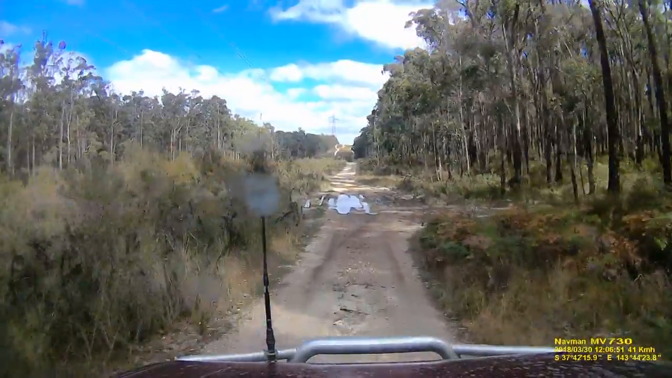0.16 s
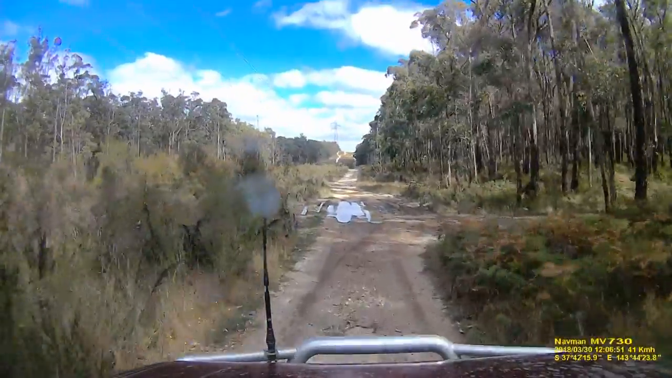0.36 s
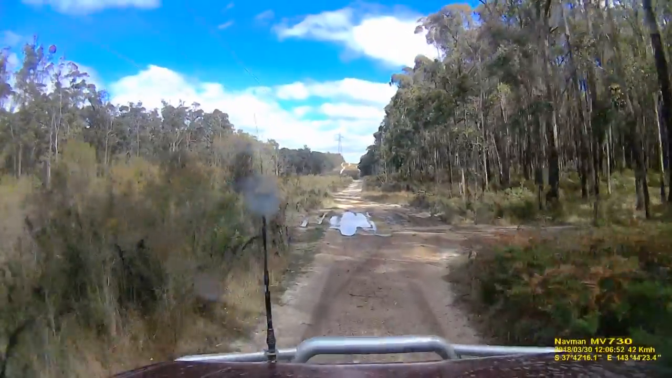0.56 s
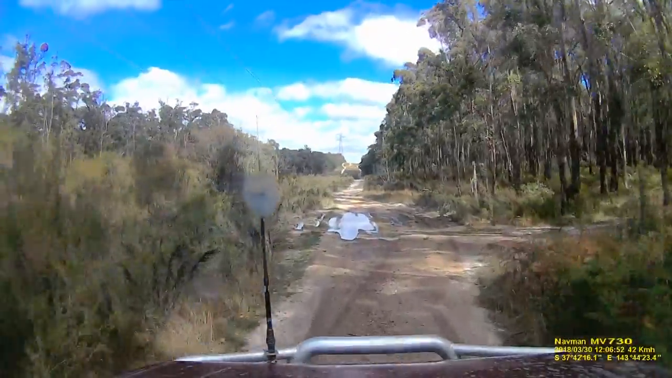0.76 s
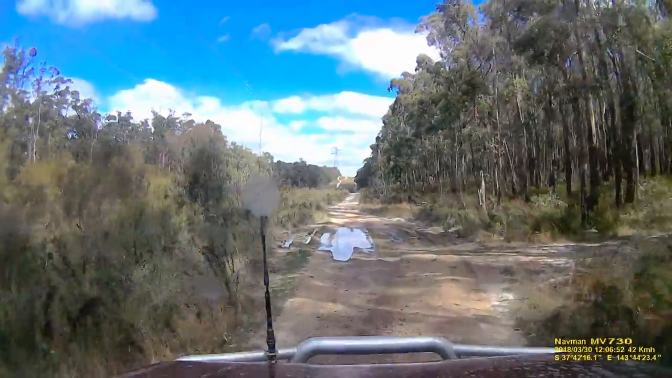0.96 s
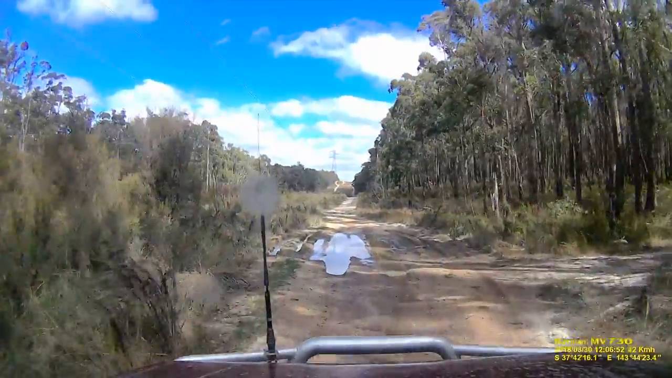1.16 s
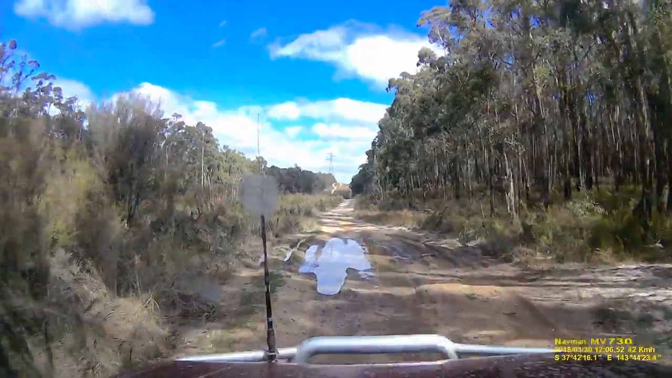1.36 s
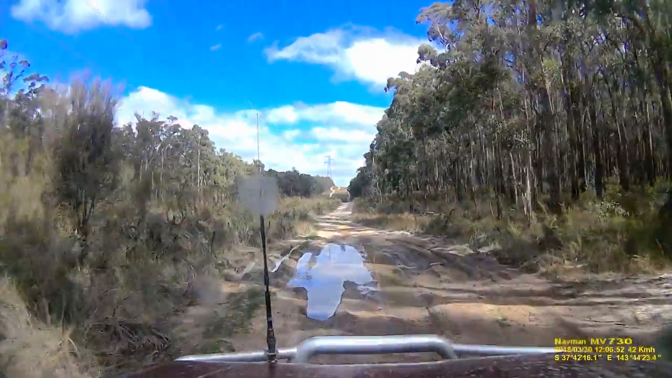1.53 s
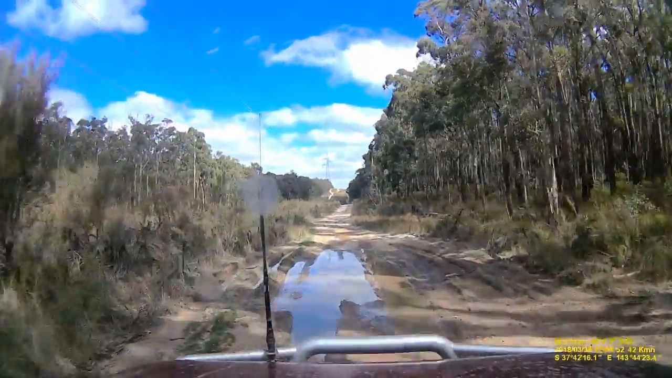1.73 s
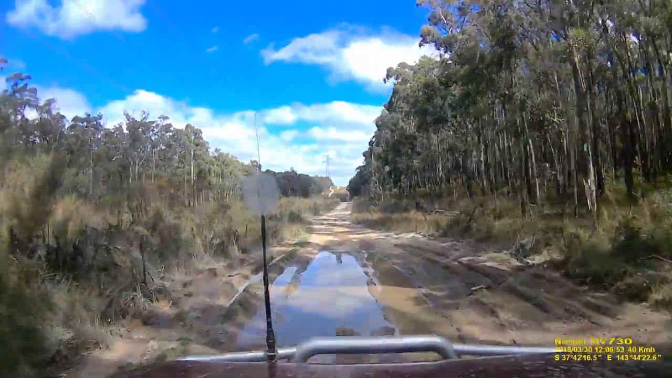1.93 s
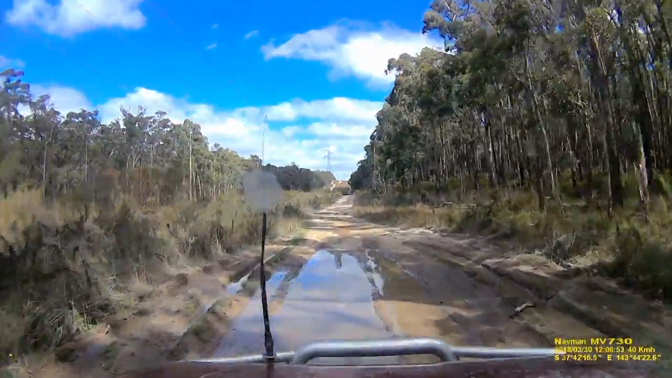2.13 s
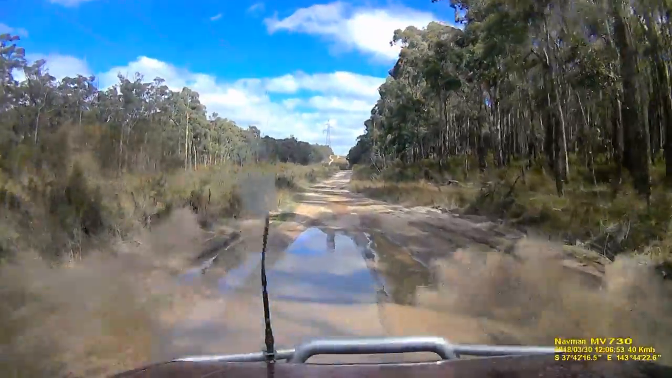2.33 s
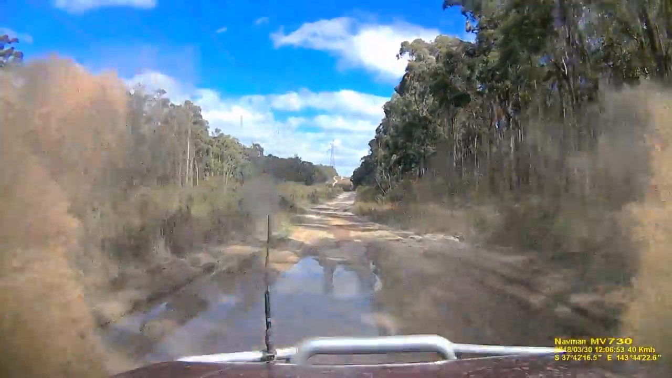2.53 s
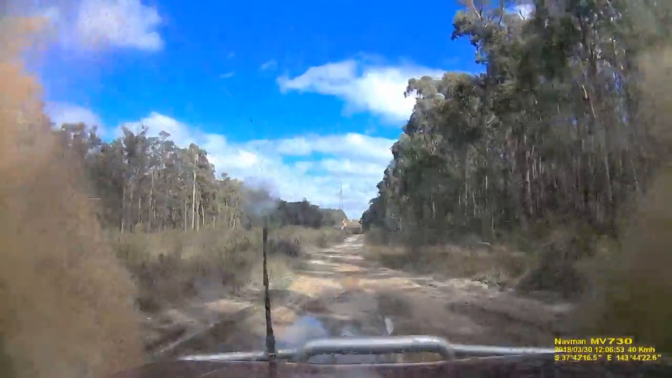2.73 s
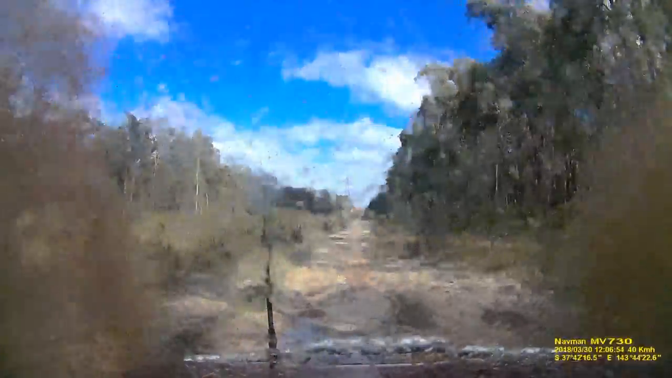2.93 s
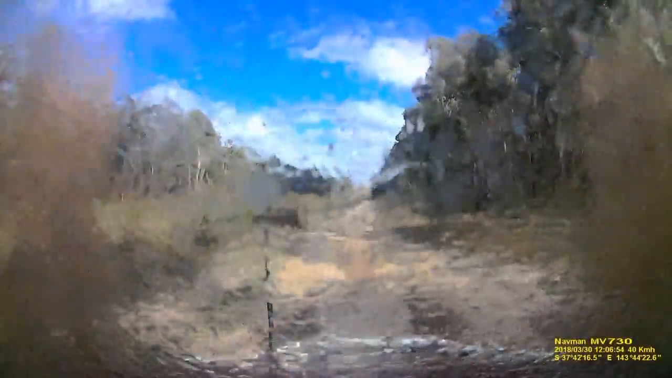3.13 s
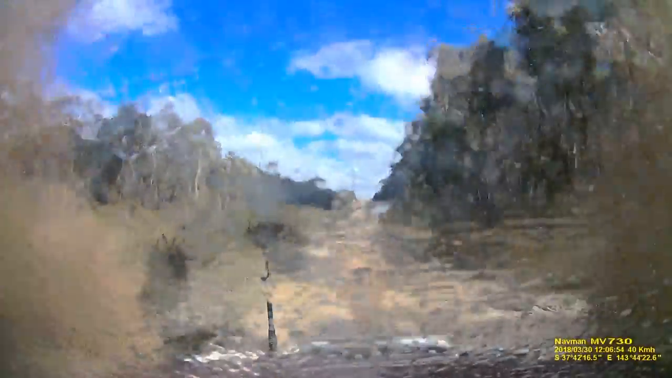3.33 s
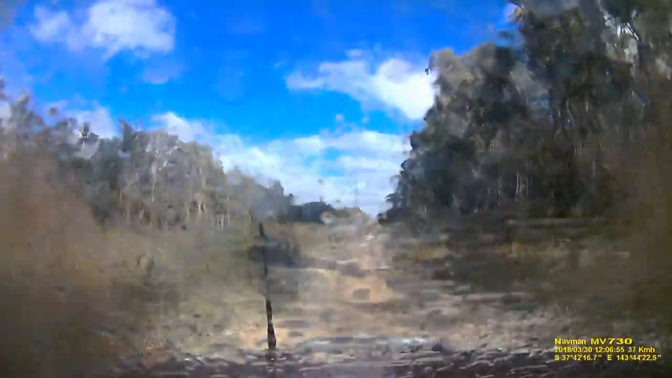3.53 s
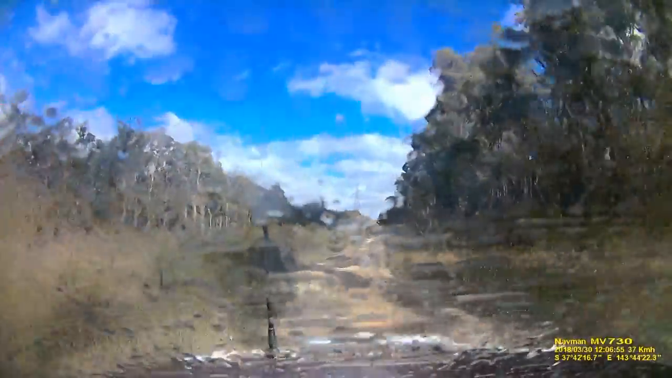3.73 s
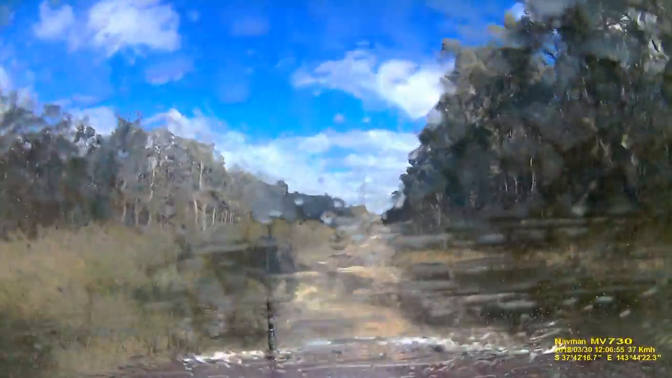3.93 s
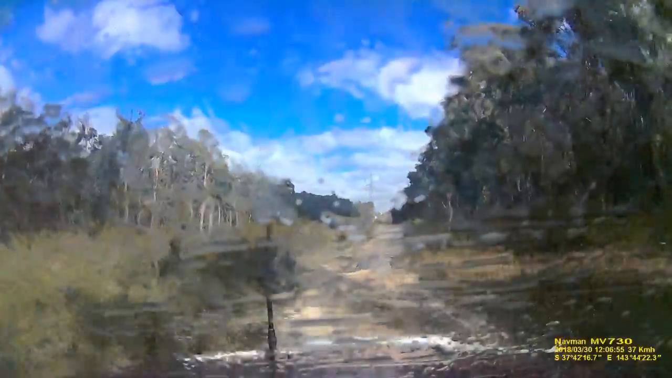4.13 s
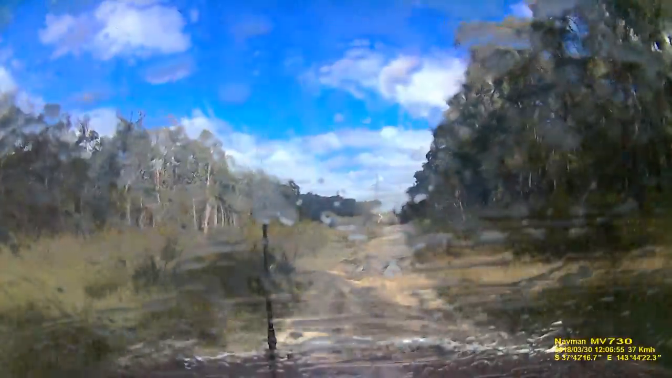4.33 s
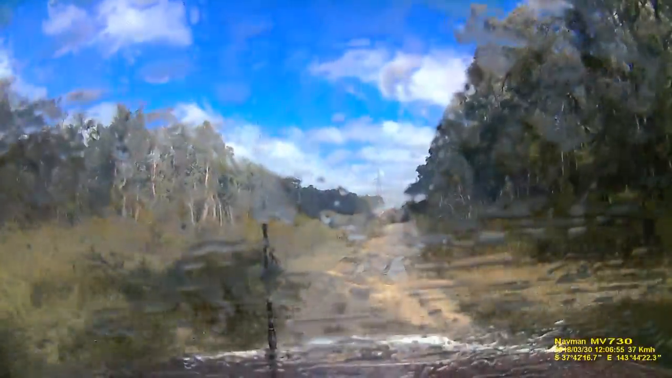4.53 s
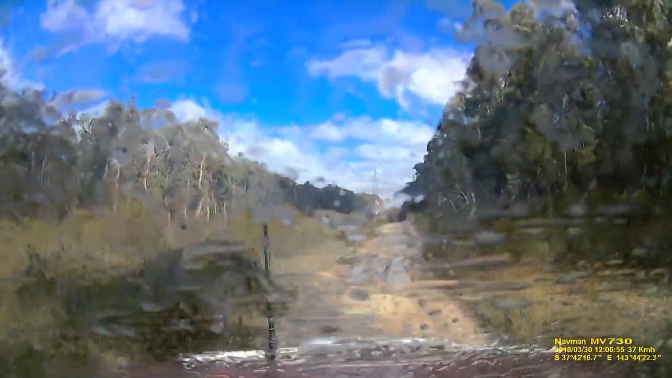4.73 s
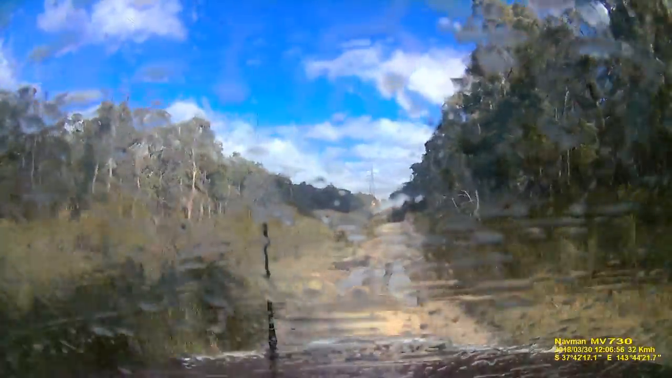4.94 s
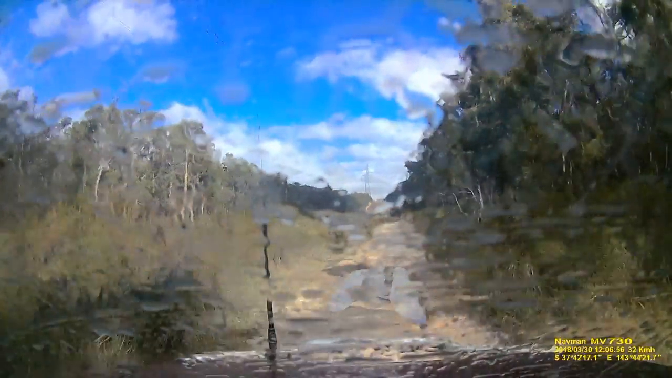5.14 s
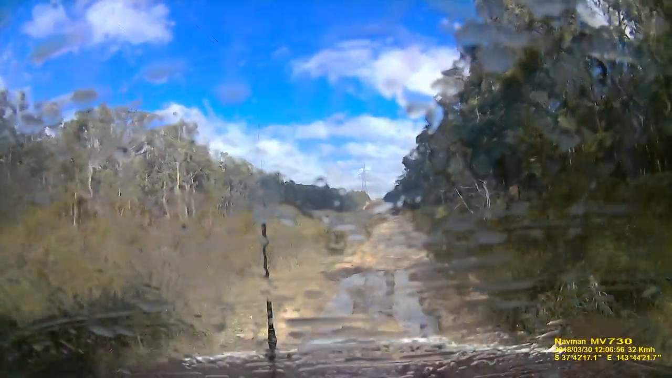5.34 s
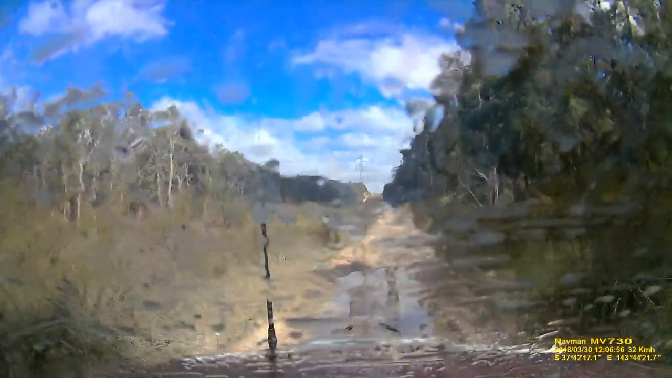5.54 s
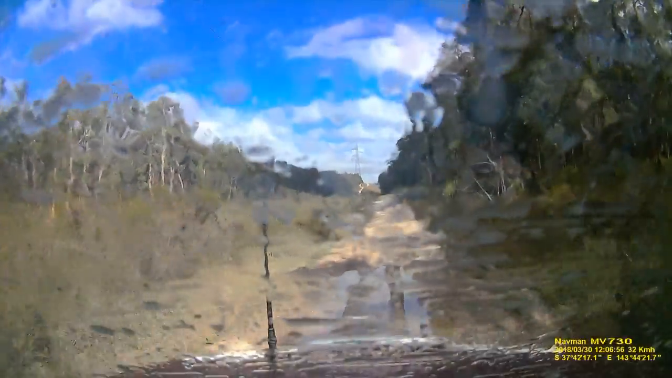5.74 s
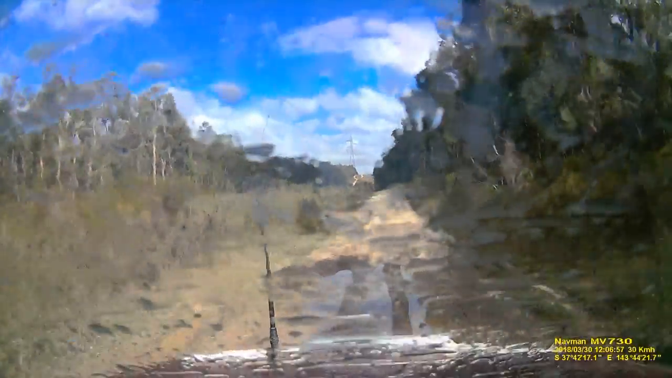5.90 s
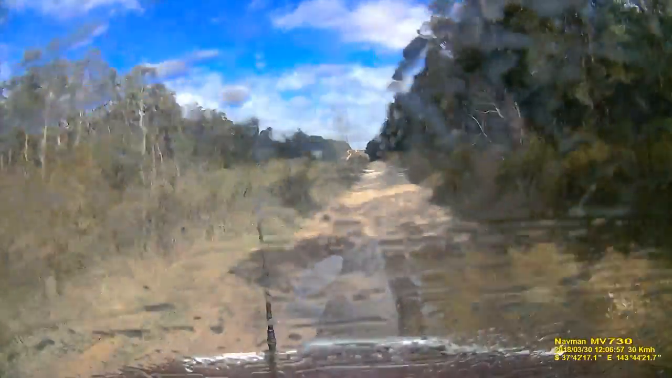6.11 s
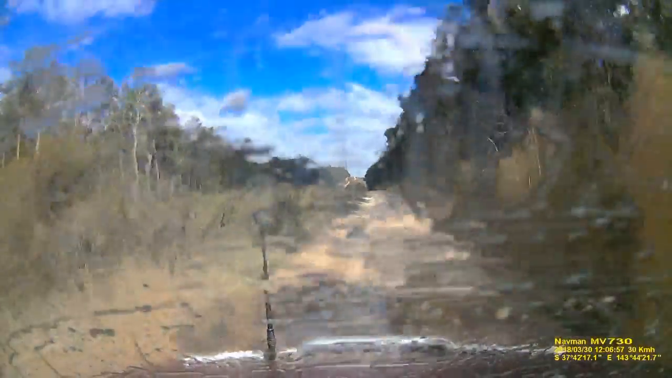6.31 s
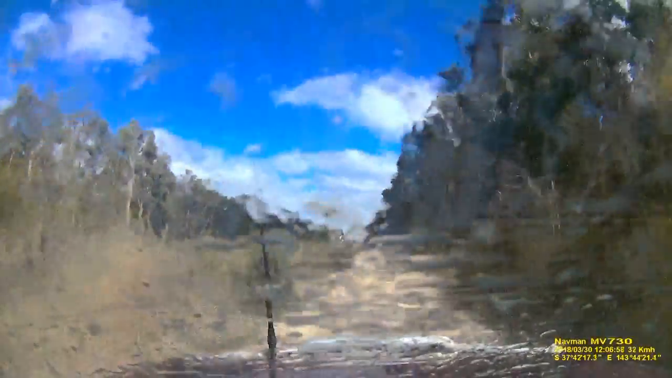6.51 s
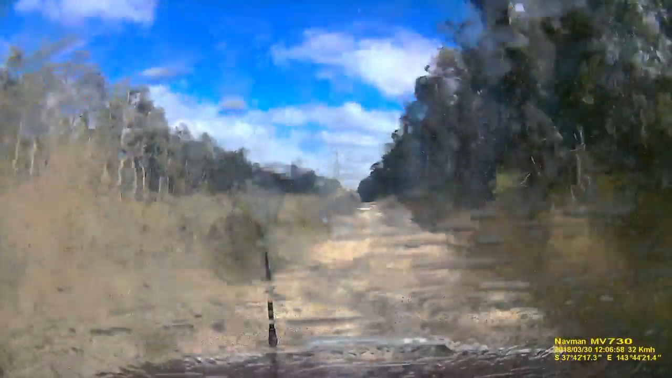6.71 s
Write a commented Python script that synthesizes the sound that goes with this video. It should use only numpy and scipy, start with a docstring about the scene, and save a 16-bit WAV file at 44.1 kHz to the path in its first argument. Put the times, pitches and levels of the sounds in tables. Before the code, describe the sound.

Close, boxy cabin sound from a dashboard microphone in a four-wheel drive. From 0 to 2 s it is fairly restrained: low body rumble swelling over bumps, engine hum fading after the start, faint high chatter of loose fittings, scattered stone ticks. At about 2.1 s the wheels plough into a puddle: dull chassis knocks, water drumming on floor pan and arches, coarse wash and bright spray. Around 2.26 and 2.75-2.9 s pressure jolts choke the sound into thuds and brief gaps. Water rains back and drains by 4 s while the engine booms, rising until 3.5 s, then sagging near 4.3 s amid bumps. From 4.5 s it growls and climbs again with a wavering gear whine, easing by 5.7 s. At 5.95-6.7 s a second puddle brings a very heavy knock at 6.15 s, drumming, sharp gritty spray and more choking thuds, ending in engine boom and falling drops.

```python
"""Inside a four-wheel drive on a gravel forest track, heard by a small microphone on the dashboard.
Around it fittings chatter, gears hum and crank orders boom in the cabin; shaped noise and patter make the ride.
Stones tick on the body as decaying bursts, and chassis knocks are bands of noise that ring briefly.
Twice the wheels plough into a puddle: water drums below the floor pan and spray patters over bonnet and windscreen.
Pressure surges of the impacts pin the diaphragm against its stops, so the sound chokes and thuds."""
import sys
import numpy as np
from scipy import signal
from scipy.fft import rfft, irfft, next_fast_len
from scipy.io import wavfile
from scipy.ndimage import uniform_filter1d

SR = 44100
rng = np.random.default_rng(int(sys.argv[2]) if len(sys.argv) > 2 else 0)


def generate_wav(signal):
    """Clip the signal to [-1, 1] and save it as 16-bit WAV at the path in sys.argv[1]."""
    frames = np.transpose(np.atleast_2d(signal))
    scaled = np.clip(frames, -1, 1) * 32767
    pcm = np.round(scaled).astype(np.int16)
    wavfile.write(sys.argv[1], SR, pcm)


N = 302790
T = np.arange(N) / SR  # time of every sample [s]


def undb(db):
    """Decibels to gain."""
    return 10 ** (np.asarray(db) / 20)


def unit(x):
    """Scale to rms 1."""
    return x / np.sqrt(np.mean(x ** 2))


def together(*gains):
    """Joint level of unrelated sounds: their powers add."""
    return np.sqrt(sum(g ** 2 for g in gains))


def curves(table):
    """The columns of a table of timed rows, interpolated to one value a sample."""
    seconds, *columns = np.transpose(table)
    return [np.interp(T, seconds, column) for column in columns]


def response(hz, points):
    """Gain of a (frequency, level) spectrum, falling 20 dB an octave beyond its ends."""
    f, db = np.transpose(points)
    octave = np.log2(np.maximum(hz, 1))
    beyond = np.abs(octave - np.clip(octave, np.log2(f[0]), np.log2(f[-1])))
    return undb(np.interp(octave, np.log2(f), db) - 20 * beyond)


def colour(x, points):
    """Give a sound a spectrum; rms 1, so only the shape of the spectrum counts."""
    size = next_fast_len(N)
    bins_hz = np.arange(size // 2 + 1) * SR / size
    shaped = rfft(x, size) * response(bins_hz, points)
    return unit(irfft(shaped, size)[:N])


def noise():
    """White noise."""
    return rng.standard_normal(N)


def walk(rate):
    """Random levels held 1 / rate s and smoothed twice; rms 1."""
    size = int(SR / rate)
    held = noise()[np.arange(N) // size]
    return unit(uniform_filter1d(uniform_filter1d(held, size), size))


def patter(rate, spread_db, decay_s):
    """Countless small impacts (rate a second) of uneven size, each a noise burst that dies away."""
    sizes = undb(spread_db * np.minimum(rng.exponential(size=N), 5))
    energy = (rng.random(N) < rate / SR) * sizes ** 2
    keep = np.exp(-2 / (decay_s * SR))
    ringing = signal.lfilter([1], [1, -keep], energy + 1e-12)
    return noise() * np.sqrt(ringing)


def add(out, s, x):
    """Mix a short sound in at a time, in place."""
    part = out[int(s * SR):][:len(x)]
    part += x[:len(part)]


def rattle(count=70, db=-65, spread_db=8.0, decay_s=0.0047, low_hz=5480, high_hz=7450, detune=0.035):
    """Loose fittings in the cabin keep chattering faintly, as decaying tones around the same two pitches."""
    out, t = np.zeros(N), T[:SR // 30]
    for when, size, which, offset in rng.random((count, 4)):
        hz = (low_hz if which < .6 else high_hz) * (1 + detune * (offset - .5))
        tone = np.exp(-t / decay_s) * np.sin(2 * np.pi * hz * t)
        add(out, when * T[-1], undb(db + spread_db * size) * tone)
    return out * (1 + 0.51 * walk(900))


# driveline whine: (time [s], pitch [Hz], level [dB])
GEAR_WHINE = [(2.9, 244.4, -55), (3.2, 248, -40), (3.45, 254, -35.5), (4.3, 236, -57.5), (4.55, 262, -37.5),
              (4.8, 249.5, -52.5), (5.3, 248, -45.5), (5.75, 251, -41), (6.2, 243.7, -63)]


def driveline(wobble=0.00649, rough_db=2):
    """Meshing gears hum on a wavering note."""
    hz, db = curves(GEAR_WHINE)
    turns = np.cumsum(hz * (1 + wobble * walk(15))) / SR
    return undb(db + rough_db * walk(17)) * np.sin(2 * np.pi * turns)


# engine over time: (time [s], crankshaft turns [Hz], drive of the boom [dB], drive of the upper-order growl [dB])
CRANKSHAFT = [(0, 41.38, -62, -37.5), (.6, 45.92, -48, -51), (2.1, 43.1, -49, -48), (2.5, 44.94, -48, -48),
              (2.7, 48.48, -30.5, -32), (3.05, 49.34, -31, -39.5), (3.25, 53.95, -33, -33),
              (3.5, 54.9, -31, -35), (3.7, 52.3, -33, -40), (3.85, 47, -36.5, -47.5),
              (4.35, 37.72, -53, -50), (4.56, 43.94, -35.5, -35), (4.95, 51, -35, -39),
              (5.35, 53.52, -33, -38), (5.7, 48.16, -38.5, -35), (6.0, 44.45, -36.5, -48),
              (6.25, 42.52, -32, -33.5), (6.55, 47.63, -33.5, -38), (6.87, 48.83, -37.5, -34.5)]
# strength of the engine orders: (multiple of the crank rate, relative level [dB])
ENGINE_ORDERS = [(2, 0.5), (2.5, -33.5), (3, -1.5), (4, -7), (5, -9.5), (5.5, -12.5), (6, -7.5), (6.5, -10),
                 (7, -9.5), (8, -7.5), (9, -17)]
# how the cabin carries the engine: (frequency [Hz], gain [dB])
CABIN_RESONANCE = [(75, -19), (90, -17), (100, -4), (108, -5.5), (120, 3.5), (132, 1), (146, -0.5),
                   (156, -24.5), (215, -10.5), (262, -0.5), (320, -2.5), (370, -8), (420, -10.5),
                   (600, -11)]


def engine(rough_db=0.7, upper_rough_db=3.0, wobble=0.0025, scatter=0.068):
    """Crank orders sweep through the cabin's boom resonances; uneven firing smears the upper ones into a growl."""
    hz, boom_db, growl_db = curves(CRANKSHAFT)
    turns = np.cumsum(hz * (1 + wobble * walk(24.83))) / SR
    out = 0
    for order, db in ENGINE_ORDERS:
        if order < 3.5:
            drive_db, slip = boom_db + rough_db * walk(22.47), 0
        else:
            drive_db = growl_db + upper_rough_db * walk(40)
            slip = 2 * scatter * walk(45)  # cycles
        gain = undb(db + drive_db) * response(order * hz, CABIN_RESONANCE)
        out = out + gain * np.sin(2 * np.pi * (order * turns + slip + rng.random()))
    return np.sqrt(2) * out


# roughness of the track: (time [s], body shake level [dB], tyre roar level [dB])
TRACK_ROUGHNESS = [(0, -31, -40), (.55, -46.5, -40.5), (.8, -39.5, -44), (2.05, -44, -43.5),
                   (2.3, -35, -31), (3.0, -36, -35.5), (3.5, -39.5, -36), (4.0, -38.5, -39),
                   (4.6, -39.5, -43), (5.3, -43, -43), (5.65, -38, -39), (5.95, -42.5, -39),
                   (6.2, -36, -30.5), (6.87, -43, -37.5)]
# bumps and ruts: (time [s], body shake level [dB], tyre roar level [dB])
BUMPS_AND_RUTS = [(.16, -40, -39.5), (.31, -38.5, -40), (.49, -36, -40.5), (.62, -34.5, -56),
                  (.83, -51, -55), (1.16, -47, -64), (1.42, -40.5, -48), (1.54, -42, -42.5),
                  (1.76, -36.5, -60), (1.91, -38, -46.5), (2.2, -34, -29), (2.3, -29, -33.5),
                  (2.85, -38, -33.5), (3.45, -40, -42), (3.76, -48, -60), (4.09, -31.5, -49),
                  (4.23, -34, -39), (4.45, -34.5, -47), (5.72, -34, -48), (6.16, -32, -30.5),
                  (6.44, -32, -32.5), (6.69, -35, -52)]
BUMP_SPREAD_S = 0.044  # spread of the bell-shaped swell


def ride():
    """Levels of body shake and tyre roar: the track's roughness, with a swell at every bump."""
    shake, roar = undb(curves(TRACK_ROUGHNESS))
    for s, shake_db, roar_db in BUMPS_AND_RUTS:
        swell = np.exp(-np.minimum(((T - s) / BUMP_SPREAD_S) ** 2 / 2, 20))
        shake = together(shake, undb(shake_db) * swell)
        roar = together(roar, undb(roar_db) * swell)
    return shake, roar


# spectrum of the body on its springs: (frequency [Hz], relative level [dB per Hz])
SHAKE_SPECTRUM = [(12, -39), (24, -10), (36, -2.5), (48, -0.5), (64, -4.5), (85, -7), (120, -6), (150, -17),
                  (200, -22)]
# spectrum of the tyres through the floor: (frequency [Hz], relative level [dB per Hz])
TYRE_SPECTRUM = [(70, -18), (110, 0), (141, 4), (175, 1.5), (212, -4.5), (250, 0), (310, -2.5), (365, -4),
                 (446, -2), (520, -6.5), (610, -8.5), (820, -12.5), (1100, -22), (1800, -32)]


def road(shake, roar):
    """The body shakes on its springs; ruts and water under the tyres drum through the floor."""
    rumble = colour(noise(), SHAKE_SPECTRUM)
    tyres = colour(patter(rate=900, spread_db=2.0, decay_s=0.017), TYRE_SPECTRUM)
    return rumble * shake + tyres * roar


# loose fittings and struck panels that ring: (time [s], pitch [Hz], relative level [dB])
RINGING_PARTS = [(0.274, 2480, -39), (.772, 3847, -56), (1.49, 1560, -45), (1.939, 1540, -45),
                 (2.392, 6290, -35), (2.619, 4650, -43), (2.662, 6700, -30.5), (2.998, 7620, -44),
                 (3.905, 2690, -45.5), (4.456, 2640, -50), (4.897, 2300, -47), (5.362, 1378, -43.5),
                 (5.434, 1380, -48), (5.528, 1539, -44), (5.556, 1510, -51), (6.0, 2003, -41),
                 (6.324, 6220, -38), (6.45, 6910, -32), (6.491, 6780, -37), (6.767, 5400, -41)]


def chinks(decay_s=0.0079, gain_db=-3, rise_s=0.00095, split=0.02, second=0.49):
    """Small parts rattle and panels ping, each a close pair of modes that buzzes against its mounting."""
    out, t = np.zeros(N), T[:SR // 15]
    fade = np.exp(-t / decay_s) * (1 - np.exp(-t / rise_s))
    for s, hz, db in RINGING_PARTS:
        second_hz = hz * (1 + split * rng.standard_normal())
        pair = np.sin(2 * np.pi * hz * t) + second * np.sin(2 * np.pi * (second_hz * t + rng.random()))
        add(out, s, undb(db + gain_db) * fade * pair)
    return out * (1 + 0.36 * walk(700))  # the buzz


# suspension knocks and slaps of water: (time [s], level before the fade [dB], centre frequency [Hz])
CHASSIS_KNOCKS = [(0.101, -39.5, 800), (0.273, -40.5, 800), (1.501, -53, 750), (1.933, -36.5, 710),
                  (2.166, -34, 830), (2.282, -20, 280), (2.312, -23, 198), (2.335, -18, 280),
                  (2.404, -22.5, 446), (2.59, -19.5, 130), (2.679, -17, 142), (2.76, -34, 790),
                  (3.005, -23, 151), (5.525, -34.5, 750), (5.555, -37.5, 840), (5.724, -27, 130.8),
                  (6.0, -32, 890), (6.1, -26, 300.5), (6.125, -34, 790), (6.146, -10.5, 198),
                  (6.164, -34.5, 996), (6.208, -29.5, 780), (6.304, -16.5, 206), (6.397, -20.5, 168.9),
                  (6.498, -23, 560.6)]


def knocks(decay_s=0.0064, cycles=0.83, width=0.37):
    """Dull blows through the chassis, each a broad resonance of noise; the low ones ring longer."""
    out, t = np.zeros(N), T[:SR // 6]
    for s, db, hz in CHASSIS_KNOCKS:
        edges_hz = [hz / (1 + width), hz * (1 + width)]
        band = signal.butter(2, edges_hz, "band", fs=SR, output="sos")
        ring = unit(signal.sosfilt(band, rng.standard_normal(len(t))))
        add(out, s, undb(db) * ring * np.exp(-t / (decay_s + cycles / hz)))
    return out


# single stones and gobs of mud hitting the body: (time [s], body level [dB], ring level [dB])
STONE_HITS = [(.161, -51, -53), (0.2722, -47, -60), (.5167, -52, -60), (.534, -47, -47.5),
              (0.591, -49.5, -50.5), (.6449, -54, -53), (1.0345, -53, -66), (1.2235, -52.5, -58.5),
              (1.433, -60, -55.5), (1.502, -54.5, -68), (1.6967, -55.5, -57), (1.7739, -55.5, -61),
              (1.936, -54, -70), (2.16, -46, -44), (2.292, -54, -58), (2.393, -49, -46),
              (2.4545, -55, -38.5), (2.659, -59, -41), (3.0053, -40.5, -40), (3.6505, -48, -49),
              (3.896, -48.5, -57), (4.3814, -56, -52.5), (4.443, -55, -56), (4.568, -50.5, -65),
              (5.4864, -58, -57), (5.6108, -52, -55), (5.6303, -51, -51.5), (5.9669, -47, -51),
              (6.046, -48, -57), (6.165, -42.5, -54), (6.304, -38, -37.5), (6.3215, -48, -34),
              (6.4482, -42, -35), (6.4615, -47, -37), (6.4775, -62, -42), (6.4988, -40.5, -42)]
# spectrum of a stone on the panel: (frequency [Hz], relative level [dB per Hz])
STONE_SPECTRUM = [(700, 5), (1500, 11.5), (2600, 10.5), (3600, 1.5), (5000, 1), (6500, -0.5), (7400, -2),
                  (8600, -20), (11000, -22), (16000, -27)]
# bright spectrum of ringing hits, here and in the spray below: (frequency [Hz], relative level [dB per Hz])
SPRAY_SPECTRUM = [(2000, -44), (3300, -24.5), (4200, -12.5), (4800, -9), (5300, -7), (5900, -2),
                  (6350, 3.5), (6900, 1), (7500, -9.5), (8300, -18), (9500, -23), (12000, -22),
                  (16000, -26.5)]


def ticks(decay_s=0.0086, body_db=0, ring_db=0):
    """Single stones and gobs: a crack on the panel with a bright ring, both decaying noise."""
    t = T[:SR // 10]
    burst = np.exp(-t / decay_s)
    body, ring = np.zeros(N), np.zeros(N)
    for s, low_db, high_db in STONE_HITS:
        add(body, s, undb(low_db + body_db) * burst)
        add(ring, s, undb(high_db + ring_db) * burst)
    return body * colour(noise(), STONE_SPECTRUM) + ring * colour(noise(), SPRAY_SPECTRUM)


SPLASH_ATTACK_S, DRUM_RELEASE_S, SPRAY_RELEASE_S, SHOWER_RELEASE_S = 0.047, 0.075, 0.048, 0.2


def plunge(s, length, release_s):
    """Envelope of one burst of water: it builds, holds until its length is over, and dies away."""
    build = np.clip((T - s) / SPLASH_ATTACK_S, 0, 1) ** 2
    return build * np.exp(-np.clip((T - s - length) / release_s, 0, 20))


# water flung high comes down on the vehicle: (time [s], length [s], bonnet level [dB], windscreen level [dB])
LATE_SHOWERS = [(2.876, 0.3, -50, -64.5), (3.747, 0.47, -65.5, -67)]
# spectrum of its landing on the bonnet: (frequency [Hz], relative level [dB per Hz])
BONNET_SPECTRUM = [(900, 13), (1600, -0.5), (2700, 2.5), (3700, -2.5), (4800, -13), (6500, -7.5),
                   (8500, -33)]


def shower():
    """The water flung highest lands late, pattering on bonnet and windscreen."""
    bonnet, glass = 0, 0
    for s, length, bonnet_db, glass_db in LATE_SHOWERS:
        falling = plunge(s, length, SHOWER_RELEASE_S)
        bonnet = bonnet + undb(bonnet_db) * falling
        glass = glass + undb(glass_db) * falling
    drops = patter(rate=1100, spread_db=2, decay_s=0.0024)
    return colour(drops, BONNET_SPECTRUM) * bonnet + colour(drops, SPRAY_SPECTRUM) * glass


# wheels plough into water: (time [s], length [s], floor pan level [dB], wheel arch level [dB],
# coarse wash level [dB], fine spray level before the spray gain [dB])
WHEEL_SPLASHES = [(2.118, 0.075, -35, -48, -40, -47.5), (2.232, 0.15, -31, -29, -45, -69),
                  (2.33, 0.14, -43, -29.5, -43.5, -56), (2.44, 0.2, -35.5, -41.5, -49.5, -51.5),
                  (2.688, 0.17, -25, -38, -47, -51.5), (5.949, .06, -44, -39.5, -40.5, -48.5),
                  (6.058, 0.13, -36, -29, -41.5, -51.5), (6.167, 0.059, -36, -31, -45.5, -49.5),
                  (6.261, .05, -44, -47, -57, -48), (6.376, 0.16, -31.5, -56, -46, -45),
                  (6.54, 0.14, -31, -34, -43.5, -51.5)]


def water():
    """Levels of the water on floor pan, wheel arches, panels and glass, over all splashes."""
    power = np.zeros((4, N))
    for s, length, floor_db, arch_db, wash_db, spray_db in WHEEL_SPLASHES:
        drum = plunge(s, length, DRUM_RELEASE_S)
        fling = plunge(s, length, SPRAY_RELEASE_S)
        levels = [undb(floor_db) * drum, undb(arch_db) * drum, undb(wash_db) * fling, undb(spray_db) * fling]
        power += np.square(levels)
    return np.sqrt(power)


# thrown water keeps raining back on the body; levels against the splash
RUNOFF_S, RUNOFF_WASH_DB, RUNOFF_SPRAY_DB = 0.51, -9, -2.5


def runoff(flung):
    """Level of the water that falls back: it gathers during a splash and drains slowly."""
    keep = np.exp(-2 / (RUNOFF_S * SR))
    return np.sqrt(signal.lfilter([1 - keep], [1, -keep], flung ** 2))


# spectrum of coarse wash on the panels: (frequency [Hz], relative level [dB per Hz])
WASH_SPECTRUM = [(400, -17), (800, 6), (1050, -0.5), (1300, -5), (1550, -6), (1900, -8.5), (2650, -7.5),
                 (3200, -14.5), (4200, -21.5), (7000, -28)]
GRIT_WASH_DB, GRIT_SPRAY_DB = -17, -24.5  # grit flung by the tyres, against their roar


def thrown(roar, wash, spray, fine_db=-6, spray_gain_db=-4.0, clump_db=0.63):
    """Grit and drops from the tyres, in clumps: a coarse wash on the panels, a fine patter on the glass."""
    on_panels = together(roar * undb(GRIT_WASH_DB), wash, runoff(wash) * undb(RUNOFF_WASH_DB))
    on_glass = together(roar * undb(GRIT_SPRAY_DB), spray, runoff(spray) * undb(RUNOFF_SPRAY_DB))
    shared = patter(rate=1100, spread_db=2.0, decay_s=0.0042)
    fine = patter(rate=300, spread_db=4.5, decay_s=0.0032)
    mixed = unit(shared) + undb(fine_db) * unit(fine)
    drops = colour(mixed, SPRAY_SPECTRUM) * undb(spray_gain_db)
    clumps = undb(clump_db * walk(35))
    return (colour(shared, WASH_SPECTRUM) * on_panels + drops * on_glass) * clumps


# spectrum of water under the floor pan: (frequency [Hz], relative level [dB per Hz])
PAN_SPECTRUM = [(40, -19), (75, -11), (120, 8), (165, 3.5), (220, -6), (285, -9), (380, -2.5), (600, -56)]
# spectrum of the wheel arch boom: (frequency [Hz], relative level [dB per Hz])
ARCH_SPECTRUM = [(190, -11), (245, -2.5), (266, -1), (287, -2.5), (310, -10), (360, -20), (600, -15.5)]


def puddles(floor, arch):
    """Sheets of water heave against the floor pan and drum in the wheel arches."""
    pan = colour(patter(rate=240, spread_db=1, decay_s=0.0031), PAN_SPECTRUM)
    arches = colour(patter(rate=550, spread_db=1.5, decay_s=0.0019), ARCH_SPECTRUM)
    return pan * floor + arches * arch


def scene():
    """Everything as it reaches the dashboard."""
    shake, roar = ride()
    floor, arch, wash, spray = water()
    vehicle = engine() + driveline() + road(shake, roar) + chinks() + rattle() + knocks()
    wet = puddles(floor, arch) + thrown(roar, wash, spray) + shower()
    return (vehicle + wet + ticks())[None]


# pressure jolts that overload the microphone: (time [s], time pinned [s],
# time pinned on the rebound [s], relative thud level [dB])
PRESSURE_JOLTS = [(2.258, .01, .005, -10), (2.764, .01, 0, -8), (2.778, .0215, .017, -7),
                  (2.847, .0145, .0145, -7), (2.884, .008, 0, -13), (6.15, .007, 0, -12),
                  (6.182, .012, 0, -9), (6.522, .004, 0, -22), (6.541, .017, .015, -9),
                  (6.597, .016, .019, -12), (6.651, .014, .014, -10)]
CROSSING_S = .004  # from one stop to the other


def overload(x, coupling_hz=135, damping=0.95, arrival_db=-2, release_db=0, snap=0.17, snap_hz=3000):
    """A jolt pins the diaphragm on one stop, then maybe the other: sound is blocked, arrival and release thud."""
    t = T[:SR // 50]
    swing = 2 * np.pi * coupling_hz * t
    fade = np.exp(-damping * swing)
    arrival = undb(arrival_db) * fade * np.sin(swing)
    # it comes free with a snap
    onset = 1 - np.exp(-2 * np.pi * snap_hz * t)
    release = undb(release_db) * fade * np.sin(swing + snap) * onset
    thuds, free = np.zeros(N), np.ones(N)
    for s, push, rebound, db in PRESSURE_JOLTS:
        for start, hold, side in (s, push, 1), (s + push + CROSSING_S, rebound, -1):
            if hold > 0:
                add(thuds, start, side * undb(db) * arrival)
                add(thuds, start + hold, side * undb(db) * release)
                free[int(start * SR):int((start + hold) * SR)] = 0
    return x * uniform_filter1d(free, size=24) + thuds


# spectrum of the hiss of the microphone's own circuit: (frequency [Hz], relative level [dB per Hz])
HISS_SPECTRUM = [(3000, 13), (6500, 5.5), (8500, 6), (11000, 3.5), (16000, 4)]
TOP_HZ = 16000  # upper limit of the recorder


def record(dry, hiss_db=-80, low_cut_hz=11):
    """The dashboard microphone hisses faintly and overloads; the recorder cuts both ends of the range."""
    picked_up = overload(dry + undb(hiss_db) * colour(noise(), HISS_SPECTRUM))
    low_cut = signal.butter(2, low_cut_hz, "high", fs=SR, output="sos")
    high_cut = signal.ellip(10, .2, 70, TOP_HZ, fs=SR, output="sos")
    return signal.sosfilt(high_cut, signal.sosfilt(low_cut, picked_up))


dry = scene()
out = record(dry)
generate_wav(out)
```